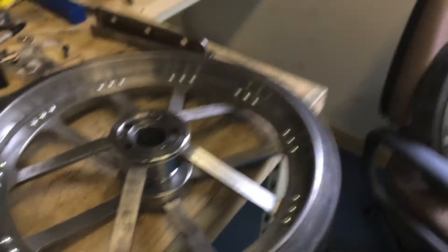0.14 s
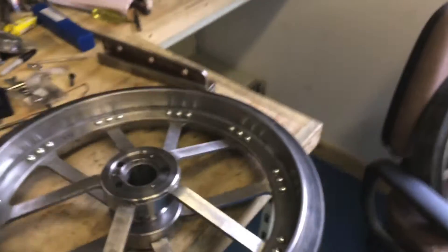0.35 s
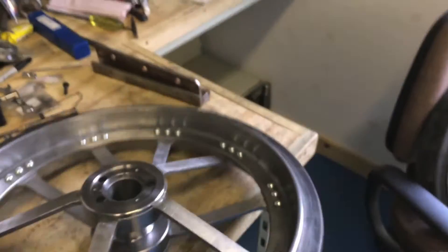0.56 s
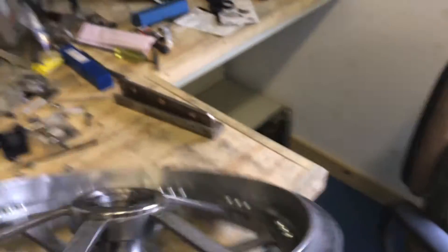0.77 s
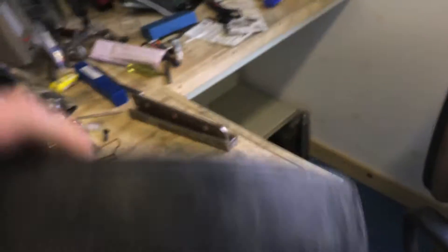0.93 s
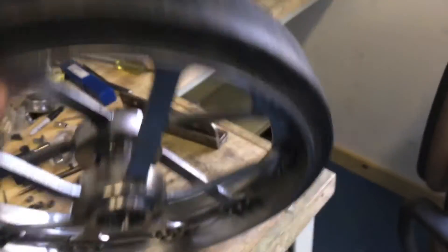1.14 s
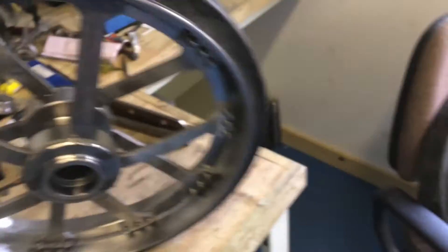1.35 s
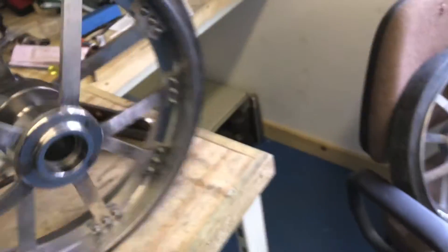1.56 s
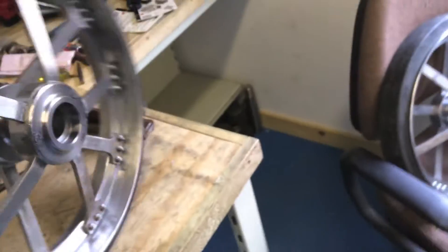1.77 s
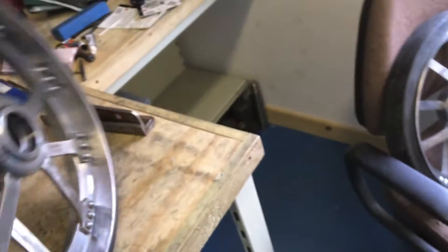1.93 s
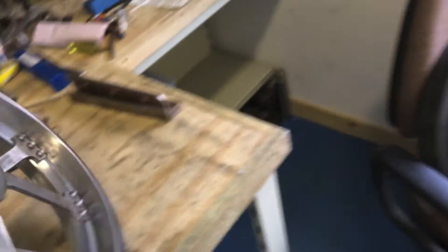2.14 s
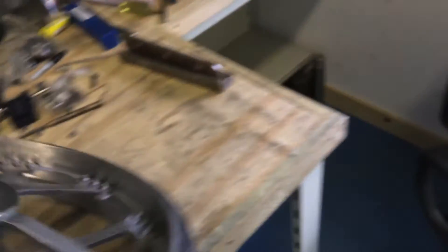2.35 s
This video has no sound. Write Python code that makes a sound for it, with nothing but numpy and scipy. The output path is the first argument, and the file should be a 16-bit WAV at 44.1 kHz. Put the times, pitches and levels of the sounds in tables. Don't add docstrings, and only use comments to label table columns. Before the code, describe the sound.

Heavy spoked metal wheel knocks hard on a wooden workbench, rattles briefly, then is quietly tipped and handled

```python
import sys
import numpy as np
from scipy import signal
from scipy.io import wavfile
from scipy.ndimage import uniform_filter1d

SR = 44100
rng = np.random.default_rng(int(sys.argv[2]) if len(sys.argv) > 2 else 0)


def decibels_to_gain(level_db):
    exponent = np.asarray(level_db, float) / 20
    return 10 ** exponent


def digitize_waveform(pressure):
    field = np.atleast_2d(pressure).T
    bounded = np.clip(field, -1, 1)
    quanta = np.round(bounded * 32767).astype(np.int16)
    wavfile.write(sys.argv[1], SR, quanta)


N = 110250

# (time [s], level [dB])
DRAG_PRESSURE = [(0, -61), (.12, -66), (.45, -58), (.55, -56.5), (.72, -53), (.8, -53), (.93, -56.5),
                 (1., -62), (1.08, -67.5), (1.15, -68.5), (1.3, -76), (1.45, -76), (1.95, -71.5),
                 (2.07, -66), (2.2, -68), (2.33, -64), (2.5, -60.5)]
# (frequency [Hz], level [dB])
DRAG_TONE = [(59, 1.5), (100, -28), (177, 0), (378, -8), (447, -7), (668, -11), (998, -12.5), (4020, -18),
             (15500, -35.5)]
# (time [s], level [dB])
SLIDE_PRESSURE = [(0, -71.5), (.13, -67.5), (.2, -73), (.52, -73.5), (.7, -54.5), (.79, -64.5),
                  (.92, -64.5), (.95, -100), (1.08, -73.5), (1.17, -61), (1.31, -66), (1.35, -76),
                  (1.98, -80.5), (2.08, -69.5), (2.2, -81.5), (2.32, -72.5), (2.38, -69.5), (2.5, -66.5)]
# (frequency [Hz], level [dB])
SLIDE_TONE = [(1470, -47.5), (2500, -41), (3520, 4), (4930, 0), (5570, -0.5), (7800, 3), (10000, -2),
              (10900, -2.5), (15500, -5.5)]
# (time of the stop [s], level [dB], rise [s])
FLICKS = [
    (0.64, -65, 0.0043),
    (0.7783, -54, 0.021),
    (.88, -64.5, .004),
    (1.008, -67.5, 0.017),
    (2.154, -63.5, 0.013),
]
# (frequency [Hz], level [dB])
FLICK_TONE = [(1500, -22), (3000, 5), (4500, 6), (5600, -6), (7200, 5), (10000, -6), (15500, -9)]
# (time [s], frame rumble [dB], rim hum [dB])
ROLLING_LOAD = [(0, -73, -71), (.15, -81, -74), (.4, -53.5, -84), (.55, -63, -68), (.66, -52.5, -76),
                (.9, -63, -62), (1.02, -58.5, -86), (1.1, -68, -77), (1.2, -55, -77), (1.42, -53.5, -81),
                (1.58, -75, -89.5), (1.72, -60, -80), (1.9, -60.5, -90), (2.02, -69, -89.5),
                (2.2, -61, -85), (2.32, -61, -77), (2.5, -61, -70.5)]
# (frequency [Hz], level [dB])
AIR_TONE = [(24, -49.5), (40, 4), (154, 6), (538, -31), (641, -30), (708, -20.5), (1620, -15.5),
            (2730, -23.5), (15700, -35)]
# (time [s], peak level [dB], pitch
# [Hz], swell [s])
TAPS = [(.025, -54, 620, 0.0028), (0.086, -49.5, 1185, 0.0006), (.222, -54, 445, 0.003),
        (1.122, -59, 600, .001), (1.232, -59, 700, 0.00067), (1.925, -52.5, 330, 0.0023),
        (2.066, -59.5, 1290, 0.0008), (2.247, -41.5, 584, 0.00038), (2.2415, -59, 6170, .0006),
        (2.2545, -60, 1500, .0005), (2.3028, -47.5, 700, 0.0004), (2.3024, -55, 1490, .0004),
        (2.307, -58, 1500, 0.00056), (2.3202, -58, 1210, .0005), (2.354, -55, 805, .0008),
        (2.218, -58.5, 1200, .0005), (1.019, -52.5, 280, 0.005), (.274, -26, 2020, .005),
        (.276, -31, 5560, .006), (1.19, -60, 200, .02), (2.41, -52.5, 930, 0.00085)]
# (time [s], peak level [dB], pitch [Hz], swell [s])
THUDS = [(0.178, -50.5, 80, 0.0076), (0.248, -6.5, 164, 0.0022), (0.2699, -17, 184, 0.003),
         (.313, -20, 171, 0.004), (0.271, -36, 53, 0.031), (.59, -50, 173, 0.011),
         (0.737, -27, 155, 0.0066), (.755, -27.5, 163, 0.0059), (0.7726, -34.5, 169, 0.0059),
         (.75, -36, 88, 0.0092), (0.785, -41, 180, .004), (.794, -37, 64.3, 0.0096),
         (0.824, -43, 150, 0.0055), (2.0669, -38, 188, 0.0027), (2.0823, -44.5, 195.6, 0.0011),
         (2.1044, -41.5, 204.4, 0.0026), (2.1165, -50, 254, .004), (2.062, -52, 62, .018),
         (.752, -43, 345, .007), (2.225, -57, 60, .02), (1.76, -57, 62, .018), (.2645, -17, 460, .004)]
# (time [s], force [dB], contact [ms])
BLOWS = [(0.2437, -4.5, 0.75), (0.245, -16.5, 0.91), (.248, -17, 1.34), (0.249, -21, 1.2),
         (.2545, -21.5, 1.3), (.26, -19, 1.13), (0.266, -10.5, 1.22), (0.2705, -18.5, 0.66),
         (0.275, -25.5, 1.4), (.281, -21.5, .5), (.287, -23.5, 1.3), (.299, -33, 0.65), (0.311, -32, .6),
         (0.319, -37, 1.3), (.382, -29.5, 1.7), (.724, -34, 2.1), (0.74, -39, 1.37), (.757, -33.5, 1.2),
         (0.779, -39, 1.5), (1.016, -54, 0.9)]
# (frequency [Hz], level [dB], t60 [s])
BENCH_MODES = [(132.25, -4.5, 0.042), (205, -11, 0.03), (270.1, -12.5, 0.037), (375, 5, 0.038),
               (420, -1.5, 0.016), (518, -1.2, 0.042), (610, -8, 0.0091), (876, -5, 0.061),
               (1174, -12, 0.07), (1544, -2, 0.057), (1900, -7, 0.036), (3000, -16, .02),
               (306, -5.5, 0.055), (495, -3.5, 0.022), (557.4, -5, .03), (700, -6.5, .035), (743, -7, 0.02),
               (1000, -6.5, .03), (1350, -8, .03), (1433, -9.5, 0.035), (1690, -7.5, 0.022),
               (2110, -7.5, .03), (2180, -11, 0.037)]
# (time [s], force [dB], rattle length [s], ring [dB])
CLANKS = [
    (0.2449, -23, 0.0041, -32.5),
    (0.2521, -21, 0.0083, -28),
    (0.271, -18, 0.011, -19),
    (.281, -27, 0.0088, -18.5),
    (0.302, -38.5, 0.036, -24),
    (.328, -42.5, .012, -17),
]
# (frequency [Hz], level [dB], t60 [s])
STEEL_MODES = [(3126, -5.5, 0.3), (4100, -11, 0.2), (4360, -8.5, 0.2), (4930, -4.5, 0.12), (5300, -1, 0.05),
               (5690, -1, 0.06), (6870, -3, 0.22), (7391, -12, 0.2), (8371, 1, 0.2), (9060, -13, .13),
               (9230, -15, .22), (11230, -6.5, 0.16), (11740, -11, 0.18), (13990, -20, .45),
               (14710, -9, .15)]
# (frequency [Hz], level [dB])
RATTLE_TONE = [(500, -9), (900, 0), (2000, -0.5), (2600, -6), (4500, -11.5), (5600, -10.5), (6400, -19),
               (9000, -25.5), (15500, -37.5)]
# (middle [s], half length [s], frequency [Hz], level [dB])
SINGS = [(0.82, 0.024, 8350, -67), (0.71, .04, 3900, -65), (0.725, 0.063, 6270, -60.5),
         (.77, 0.0096, 6300, -57), (0.96, .02, 8400, -71), (0.62, .03, 7300, -76), (.86, .03, 6000, -67),
         (.865, 0.013, 4300, -59.5), (0.866, .04, 3200, -59), (0.925, 0.044, 3100, -63),
         (1.186, 0.08, 7200, -69.5), (1.15, 0.021, 1780, -66), (0.93, 0.035, 1890, -70),
         (1.72, 0.022, 1590, -69.5), (1.7, 0.013, 1770, -73), (1.42, .03, 1800, -75.5),
         (1.63, 0.026, 1650, -74.5), (1.82, 0.033, 1800, -77), (1.2, 0.041, 3550, -72)]
# (time [s], level [dB], length [s])
GRATES = [
    (0.75, -45.5, 0.033),
    (0.821, -63.5, 0.047),
    (0.869, -64, 0.076),
    (1.134, -67, 0.033),
]
# (frequency [Hz], width [Hz], level [dB])
RIM_RESONANCES = [(1457, 84, 0.5), (1602, 100, 6), (1867, 98, 4), (1960, 81, -0.5), (2380, 370, -10.5),
                  (2990, 110, 1.5), (3200, 140, -1), (4250, 160, -6)]
# (frequency [Hz], t60 [s])
ROOM_DECAY = [(60, 0.46), (200, 0.31), (600, 0.35), (2000, 0.4), (5000, 0.34), (12000, 0.23)]


def evened(x):
    return x / np.sqrt(np.mean(x ** 2) + 1e-20)


def read(points, hz):
    f, value = np.transpose(points)
    return np.interp(np.log(hz + 1), np.log(f + 1), value)


def follow(curve, col=1):
    c = np.array(curve)
    return decibels_to_gain(np.interp(np.arange(N) / SR, c[:, 0], c[:, col]))


def add(mix, s, sound):
    part = mix[round(s * SR):][:len(sound)]
    part += sound[:len(part)]


def resonate(x, hz, width_hz):
    turn = np.exp(2j * np.pi * np.cumsum(hz * np.ones(len(x))) / SR)
    r = np.exp(-np.pi * width_hz / SR)
    return 2 * (turn * signal.lfilter([1 - r], [1, -r], x / turn)).real


def noise(tone, patchy_db, flicker_db):
    frames, hz = N // 128 + 5, np.fft.rfftfreq(512, 1 / SR)
    a, b, patches = rng.standard_normal((frames, 257, 3)).T
    patches = uniform_filter1d(patches, size=6, axis=0)
    patches = evened(uniform_filter1d(patches, size=14, axis=1))
    flicker = evened(uniform_filter1d(rng.standard_normal(frames), size=3))
    level_db = read(tone, hz)[:, None] + patchy_db * patches + flicker_db * flicker
    spectrum = (a + 1j * b) * decibels_to_gain(level_db)
    return evened(signal.istft(spectrum, nperseg=512, noverlap=384)[1][:N])


def ring(modes, spread_db, phase, detune=0., chatter_db=0.):
    chatter_s = .006
    hz, db, t60 = np.transpose(modes)[:, :, None]
    t = np.arange(int(1.2 * t60.max() * SR)) / SR
    spot, shift = rng.standard_normal((2, *hz.shape))
    knots = rng.standard_normal((len(hz), 200))
    chatter = np.array([np.interp(t / chatter_s, np.arange(len(k)), k) for k in knots])
    level_db = db + spread_db * spot + chatter_db * chatter - 60 * t / t60
    tones = np.sin(2 * np.pi * hz * (1 + detune * shift) * t + phase)
    return (decibels_to_gain(level_db) * tones).sum(0)


def rubbing():
    stop_s = .0015
    t = np.arange(N) / SR
    drag = decibels_to_gain(2.5) * follow(DRAG_PRESSURE) * noise(DRAG_TONE, patchy_db=1.8, flicker_db=0.8)
    slide = follow(SLIDE_PRESSURE) * noise(SLIDE_TONE, patchy_db=0.8, flicker_db=0.93)
    flicks = np.zeros(N)
    for s, db, rise in FLICKS:
        flicks += decibels_to_gain(db) * np.exp(-((t - s) / np.where(t < s, rise, stop_s)) ** 2)
    return drag + slide + flicks * noise(FLICK_TONE, patchy_db=2.7, flicker_db=1.0)


def rolling():
    rumble_hz, hum_hz = 64, 1754
    lumps = decibels_to_gain(1.0 * evened(uniform_filter1d(rng.standard_normal(N), size=1500)))
    rumble = resonate(rng.standard_normal(N), rumble_hz, width_hz=14)
    rumble = resonate(rumble, rumble_hz, width_hz=77.0)
    drift = uniform_filter1d(uniform_filter1d(rng.standard_normal(N), size=3000), size=3000)
    pitch_hz = hum_hz * (1 + 0.035 * evened(drift))
    hum = resonate(rng.standard_normal(N) * lumps, pitch_hz, width_hz=140)
    hum = resonate(hum, pitch_hz, width_hz=300.)
    return follow(ROLLING_LOAD) * evened(rumble * lumps) + follow(ROLLING_LOAD, col=2) * evened(hum)


def still_air():
    return decibels_to_gain(-65.5) * noise(AIR_TONE, patchy_db=-0.2, flicker_db=-2.0)


def thuds_and_taps():
    out = np.zeros(N)
    for s, db, hz, swell in THUDS + TAPS:
        t = np.arange(int(9 * swell * SR)) / SR
        flex = t / swell * np.exp(1 - t / swell) * np.sin(2 * np.pi * hz * t)
        b, a = signal.butter(1, 0.2 * hz, "high", fs=SR)
        add(out, s, -decibels_to_gain(db) * signal.lfilter(b, a, flex))
    return out


def bench():
    out = np.zeros(N)
    for s, db, contact_ms in BLOWS:
        force = np.hanning(max(int(contact_ms * SR / 1000), 4))
        board = -ring(BENCH_MODES, spread_db=3.0, phase=0.96, detune=.03) / 4
        add(out, s, decibels_to_gain(db) * signal.oaconvolve(board, force / force.sum()))
    board_cut_hz = 79
    return signal.sosfilt(signal.butter(2, board_cut_hz, "high", fs=SR, output="sos"), out)


def steel():
    split, rattle_rise_s, ring_rise_s = .012, 0.00017, 0.00099
    out, bed = np.zeros(N), noise(RATTLE_TONE, patchy_db=1, flicker_db=1)
    twins = [(hz * (1 + split * rng.uniform(-1.6, 1)), db - 2.0, t60 * 0.55) for hz, db, t60 in STEEL_MODES]
    pairs = STEEL_MODES + twins
    for s, db, length, ring_db in CLANKS:
        t = np.arange(int(4 * length * SR)) / SR
        burst = np.minimum(t / rattle_rise_s, 1) * np.exp(-t / length)
        add(out, s, decibels_to_gain(db) * burst * bed[round(s * SR):][:len(t)])
        phase = 2 * np.pi * rng.random((len(pairs), 1))
        tones = ring(pairs, spread_db=1.0, phase=phase, chatter_db=3.5)
        rise = np.minimum(np.arange(len(tones)) / (ring_rise_s * SR), 1)
        add(out, s, decibels_to_gain(db + ring_db) * tones * rise)
    return out


def singing():
    width_hz = 340
    out, hiss = np.zeros(N), rng.standard_normal((len(SINGS), SR // 2))
    for (s, half, hz, db), x in zip(SINGS, hiss):
        t = np.arange(len(x)) / SR - .25
        tone = resonate(resonate(x, hz, width_hz), hz, 2 * width_hz)
        add(out, s + t[0], decibels_to_gain(db) * np.exp(-(t / half) ** 2) * evened(tone))
    return out


def rim(x):
    return sum(decibels_to_gain(db) * resonate(resonate(x, hz, w), hz, 500.0) for hz, w, db in RIM_RESONANCES)


def grating():
    pressure = np.zeros(N)
    jerks = np.minimum(rng.exponential(1, N // 64 + 1), 3).repeat(64)[:N]
    slips = rng.standard_normal(N) * decibels_to_gain(1.1 * jerks)
    for s, db, length in GRATES:
        t = np.arange(0, length, 1 / SR)
        add(pressure, s, decibels_to_gain(db) * np.minimum((length - t) / 0.006, 1))
    return rim(pressure * slips) / np.std(rim(slips))


def room(x):
    taps = np.zeros(SR)
    at = np.arange(200, SR - 20, 20) + rng.integers(0, 20, (SR - 201) // 20)
    taps[at] = rng.choice([-1., 1.], at.shape)
    hz, t, z = signal.stft(taps, SR, nperseg=256)
    decay = decibels_to_gain(-60 * t / read(ROOM_DECAY, hz)[:, None])
    tail = signal.istft(z * decay, SR, nperseg=256)[1]
    return signal.fftconvolve(x, tail / np.linalg.norm(tail))[:N]


def scene():
    soft = thuds_and_taps()
    hits = bench() + steel() + grating()
    echo = decibels_to_gain(-4.5) * room(hits + decibels_to_gain(-11) * soft)
    moves = rubbing() + rolling() + singing()
    return (hits + soft + echo + moves + still_air())[None]


def band_limit(x):
    return signal.sosfilt(signal.butter(12, 15740, fs=SR, output="sos"), x)


def record(dry):
    low_cut_hz, edge_hz = 50, 15800
    x = signal.sosfilt(signal.butter(4, low_cut_hz, "high", fs=SR, output="sos"), dry)
    top_cut = signal.firwin(511, edge_hz, window=("kaiser", 9), fs=SR)
    x = signal.oaconvolve(x, top_cut[None], "same")
    return band_limit(x)


dry = scene()
out = record(dry)
digitize_waveform(out)
```